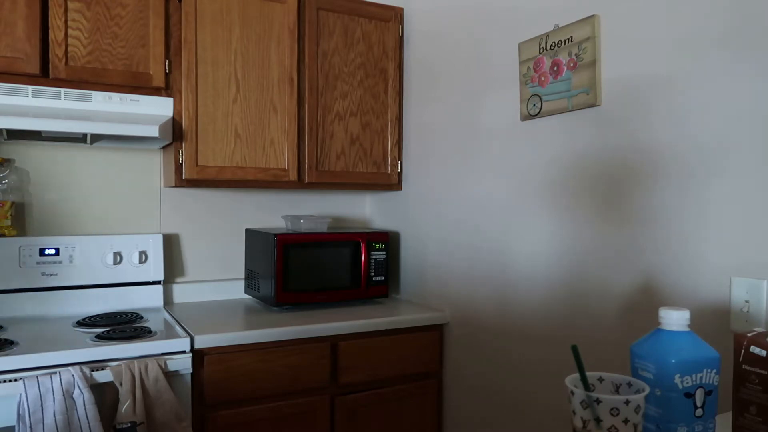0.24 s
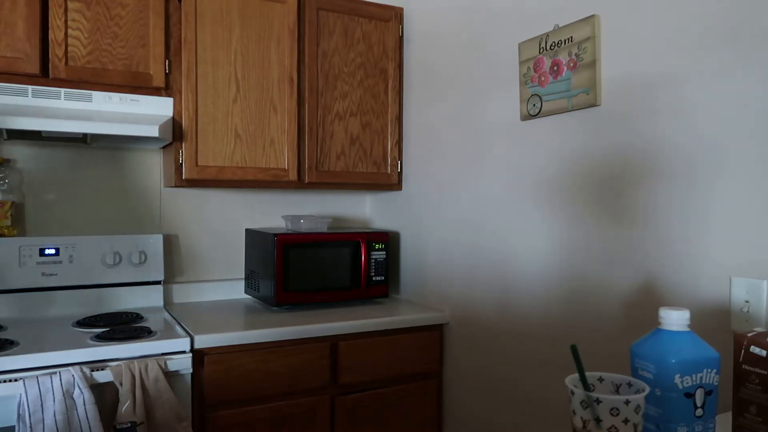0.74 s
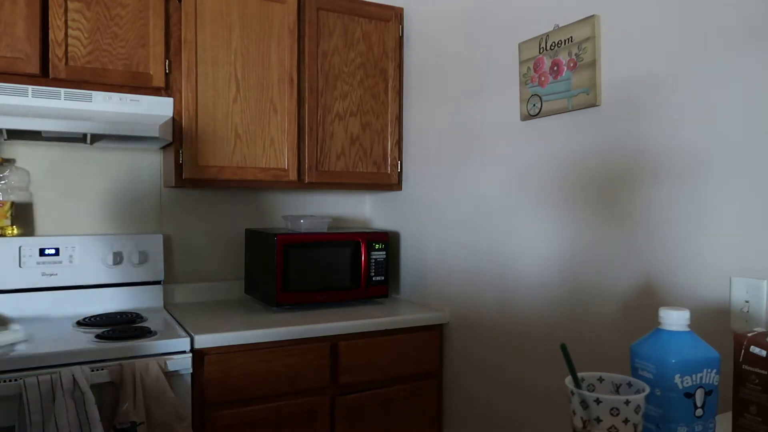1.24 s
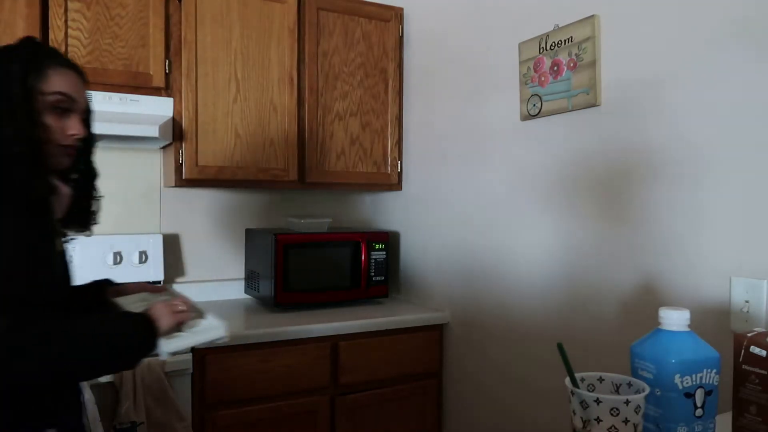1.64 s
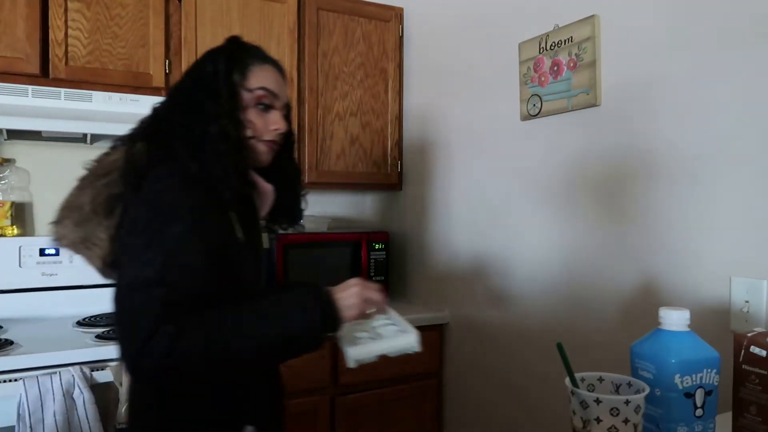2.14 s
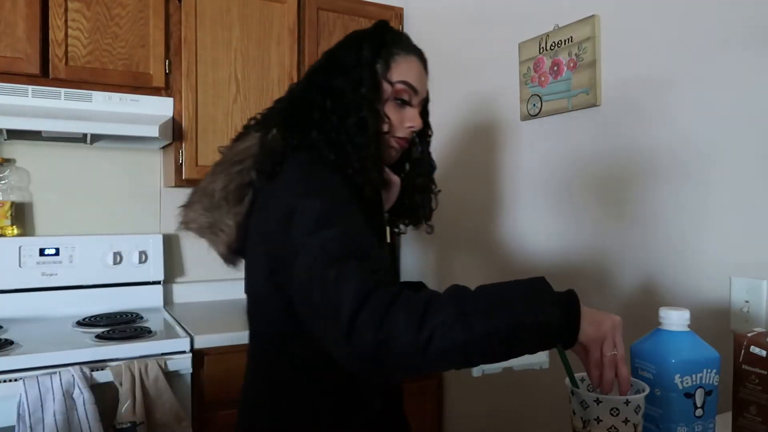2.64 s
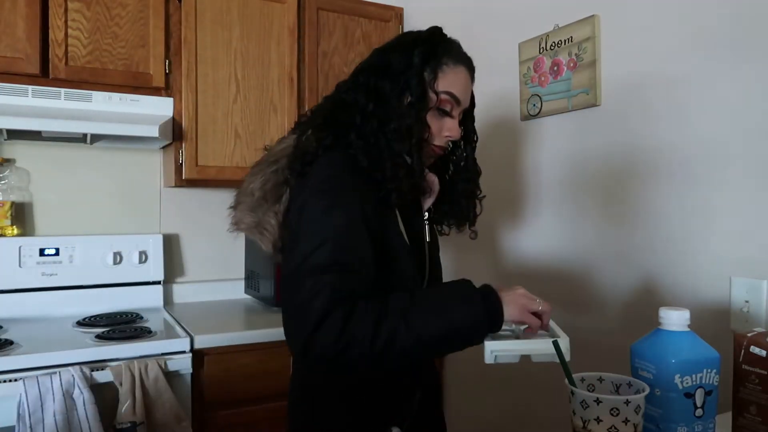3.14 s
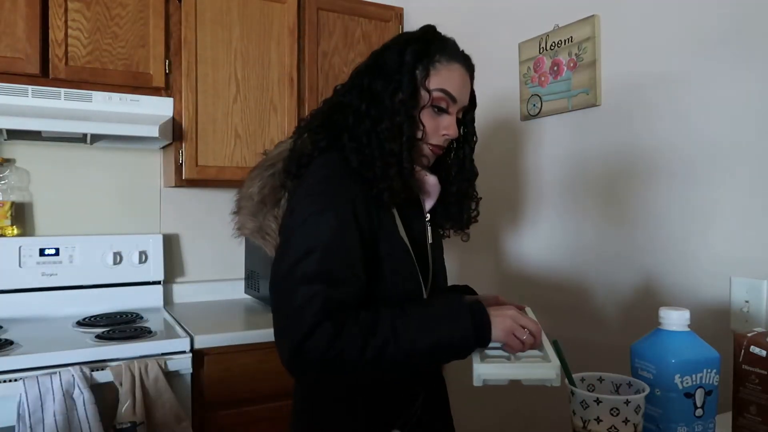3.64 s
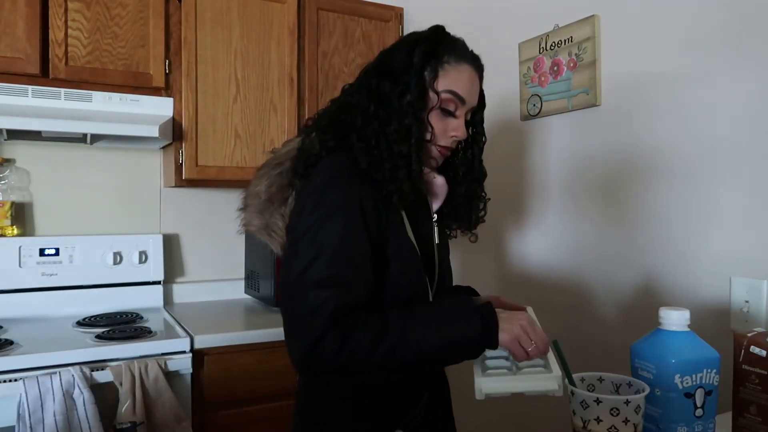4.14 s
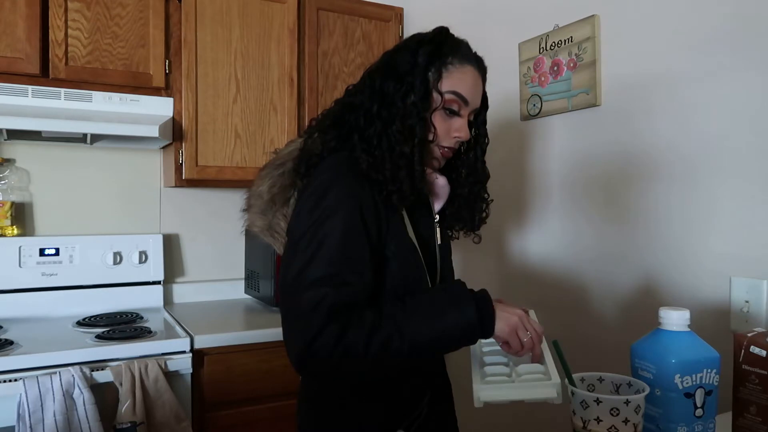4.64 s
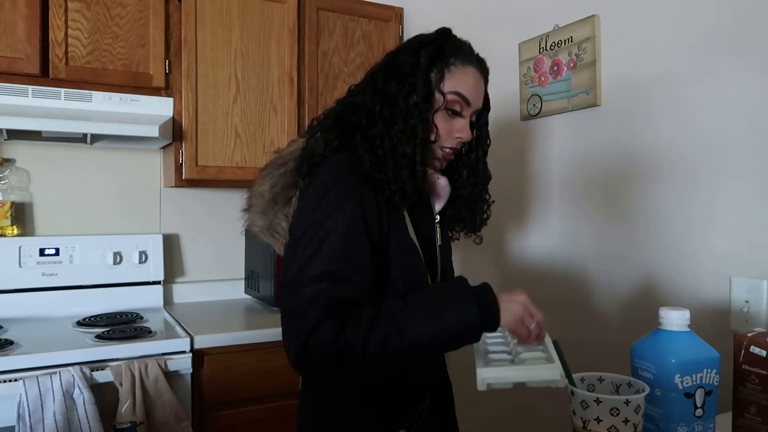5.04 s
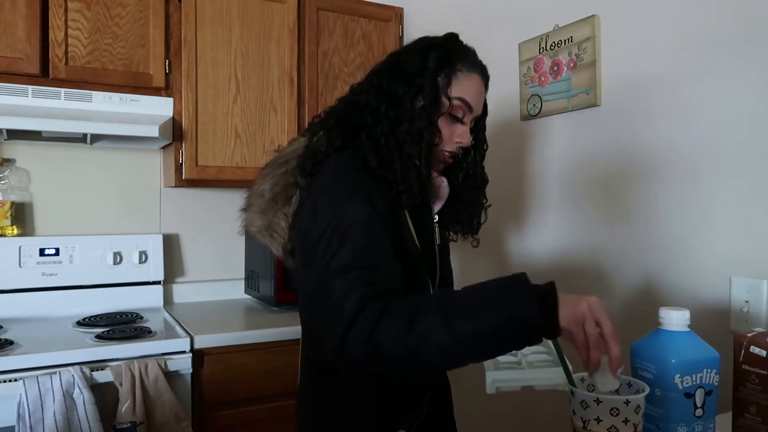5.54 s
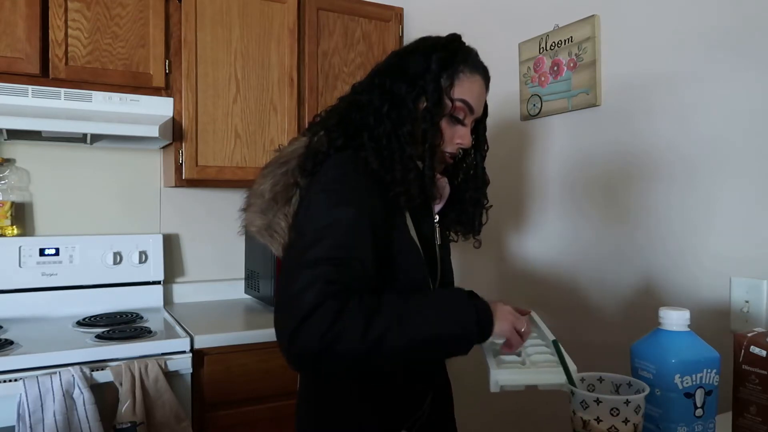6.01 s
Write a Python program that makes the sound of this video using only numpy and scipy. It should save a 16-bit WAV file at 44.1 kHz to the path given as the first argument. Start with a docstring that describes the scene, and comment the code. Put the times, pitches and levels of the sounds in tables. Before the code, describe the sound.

Ice crackles and snaps as a plastic tray is flexed, and two cubes clatter into a plastic cup in a quiet kitchen.

```python
"""Ice and plastic crackle and snap as someone flexes an ice tray and prises cubes loose, carrying it
from left to right across a quiet kitchen. Each slip or fracture is an impulse that excites the damped
modes of the tray and of ice splinters. Two cubes drop into a plastic cup, ringing its wall and thudding
on the counter. Behind it a fridge hums, steps thud and two close microphone ports hiss."""
import sys
import numpy as np
from scipy import signal
from scipy.io import wavfile
from scipy.ndimage import uniform_filter1d

SR = 44100
rng = np.random.default_rng(int(sys.argv[2]) if len(sys.argv) > 2 else 0)


def store_wav(level_fs):
    """Save 16-bit WAV to argv[1]."""
    pcm = np.round(np.clip(np.atleast_2d(level_fs), -1, 1) * 32767)
    wavfile.write(sys.argv[1], SR, pcm.T.astype(np.int16))


N = 276674

# modes of the plastic tray: (frequency [Hz], level [dB], t60 [s])
TRAY_MODES = [(736, -6.5, 0.013), (850, -8.5, 0.011), (1152, -0.5, 0.0075), (1348, -5.5, 0.015),
              (1607, -0.5, 0.012), (1807, -3, 0.013), (1967, -5, 0.017), (2144, -5.5, 0.017),
              (2323, -7, 0.019), (2535, -2.5, 0.015), (2796, 0, 0.01), (3166, -4.5, 0.014),
              (3540, 0.5, 0.01), (4007, 2, 0.0088), (5114, -2.5, 0.025), (5690, -6.5, 0.039),
              (6850, -12.5, 0.0071), (8000, -23, 0.011)]
SPLINTER_HZ = np.geomspace(3300, 14500, 26)


def amp(db):
    return 10 ** (np.asarray(db) / 20)


def power(db):
    return amp(2 * db)


def unit_rms(x):
    return x / np.sqrt(np.mean(x ** 2) + 1e-20)


def unit_peak(x):
    return x / abs(x).max()


def curve_at(points, hz):
    """Interpolation on a logarithmic frequency axis."""
    knots_hz, values = np.transpose(points)
    return np.interp(np.log(hz + 1), np.log(knots_hz + 1), values)


def add(mix, start_s, sound):
    part = mix[round(start_s * SR):][:len(sound)]
    part += sound[:len(part)]


def damped_mode(hz, db, t60, rise_s=0.00042):
    """Free vibration: a sinusoid with a soft onset and exponential decay."""
    t = np.arange(8192) / SR
    return amp(db - 60 * t / t60) * np.sin(2 * np.pi * hz * t) * (1 - np.exp(-t / rise_s))


def coupling(hz, centre_hz, octaves):
    """Selective excitation: modes far from the centre frequency of a blow respond less."""
    return 1 / (1 + (np.log2(hz / centre_hz) / octaves) ** 2)


def rattle(noise, db, t60):
    """Impulsive excitation: one blow, then sparse dying after-slips; db is their energy re the blow."""
    slips = noise ** 3 * amp(-60 * np.arange(len(noise)) / SR / max(t60, 0.004))
    return np.r_[1, np.zeros(40), amp(db) * slips / np.linalg.norm(slips)]


def room_tone():
    """Partial coherence: room noise and port hiss are alike at the two ports only in the bass."""
    # noise spectrum: (frequency [Hz], relative density [dB])
    spectrum = [(15, -17.5), (30, -45), (70, -2.5), (125, -9.5), (220, -9.5), (420, -8.5), (520, -15),
                (800, -17), (2500, -23), (5000, -27.5), (10000, -39.5), (14000, -45.5), (16000, -58)]
    # likeness of the two ports: (frequency [Hz], correlation [-1 to 1])
    correlation = [(60, 1), (180, 0.7), (550, 0.19), (1650, -0.44), (4970, -0.19), (15000, -0.08)]
    hz = np.fft.rfftfreq(2048, 1 / SR)[:, None]
    shape = (2, len(hz), N // 512 + 5)
    left, independent = rng.standard_normal(shape) + 1j * rng.standard_normal(shape)
    alike = curve_at(correlation, hz)
    right = alike * left + np.sqrt(1 - alike ** 2) * independent
    spectra = np.array([left, right]) * amp(curve_at(spectrum, hz))
    return amp(-51.5) * unit_rms(signal.istft(spectra, nperseg=2048, noverlap=1536)[1][:, :N])


def fridge():
    """Amplitude modulation: steady hum tones waver a little in strength."""
    # hum tones: (frequency [Hz], rms level [dB])
    tones = [(62, -64.5), (120, -55.5), (400.5, -58)]
    t = np.arange(N) / SR
    wavers = uniform_filter1d(uniform_filter1d(rng.standard_normal((len(tones), N)), 5000), 5000)
    return sum(np.sqrt(2) * amp(db + 0.58 * unit_rms(waver)) * np.sin(2 * np.pi * hz * t)
               for (hz, db), waver in zip(tones, wavers))


def steps():
    """Forced vibration: floor boards give under each footfall, settle, and murmur in between."""
    # footfalls: (time [s], level [dB])
    footfalls = [(.14, -50), (.4, -68), (.68, -46.5), (.95, -57), (1.2, -50), (1.55, -52), (1.81, -61),
                 (2.2, -54.5), (3.04, -63), (4.0, -59), (5.47, -68)]
    rise_s, fall_s, murmur_db = 0.043, 0.14, -68
    t = np.arange(N) / SR
    boards = signal.sosfilt(signal.butter(3, [22, 55], "band", fs=SR, output="sos"), rng.standard_normal(N))
    swells = sum(power(db) * np.exp(-((t - s) / np.where(t < s, rise_s, fall_s)) ** 2)
                 for s, db in footfalls)
    return unit_rms(boards) * np.sqrt(power(murmur_db) + swells)


def kitchen(source):
    """Reverberation: sparse echoes die away by band; the close ports differ mainly in the treble."""
    # reverberation time: (frequency [Hz], t60 [s])
    decay = [(300, 0.17), (800, 0.14), (2100, 0.14), (5500, 0.14), (12000, 0.085)]
    echoes = np.zeros((2, SR // 2))
    slots = np.arange(160, SR // 2 - 20, 20)
    arrivals = slots + rng.integers(0, 20, (2, len(slots)))
    np.put_along_axis(echoes, arrivals, rng.choice([-1., 1.], arrivals.shape), 1)
    hz, t, spectra = signal.stft(echoes, SR, nperseg=256)
    spectra = spectra * amp(-60 * t / curve_at(decay, hz)[:, None])
    width = np.clip(hz / 9000, 0, np.pi / 4)[:, None]
    mid, side = np.cos(width) * spectra[0], np.sin(width) * spectra[1]
    tail = signal.istft(np.array([mid + side, mid - side]), SR, nperseg=256)[1]
    return signal.fftconvolve(source[None], tail / np.linalg.norm(tail[0]), axes=1)[:, :N]


def ports(source):
    """Path difference: direction delays one port against the other; near surfaces scatter it."""
    # path of the source: (time [s], direction [-1 left, 1 right])
    path = [(0, -1.1), (.9, -0.97), (1.3, -1.1), (1.8, 0.84), (2.4, 0.92), (3.2, 0.79), (6.27, 0.98)]
    # lag between the ports for a source at one side: (frequency [Hz], phase [rad])
    lag = [(100, 0), (2000, .15), (3700, .35), (6800, 1.6), (11000, 2.8), (16000, 3.3)]
    hz, t, spectra = signal.stft(source, SR, nperseg=128)
    direction = np.interp(t, *np.transpose(path))
    scattered = direction + 0.5 * rng.standard_normal(spectra.shape)
    steer = amp(0.4 * direction) * np.exp(0.5j * curve_at(lag, hz)[:, None] * scattered)
    return signal.istft(np.array([spectra / steer, spectra * steer]), SR, nperseg=128)[1][:, :N]


def ice_splinters():
    """Damped resonators: each splinter of ice rings briefly at its own pitch."""
    # strength of the ringing: (frequency [Hz], relative level [dB])
    strength = [(3300, -9), (4200, -8.5), (5300, -7.5), (6700, -4), (7600, -8.5), (10000, -6),
                (12000, -8.5), (14500, -20)]
    cycles = rng.uniform(10, 34, len(SPLINTER_HZ))  # to fall by 30 dB
    return np.array([damped_mode(hz, curve_at(strength, hz), 2 * n / hz, 0.0001)[:1024] * np.sqrt(hz / n)
                     for hz, n in zip(SPLINTER_HZ, cycles)])


def cup(splinters):
    """Impact excitation: each touch of a tumbling cube rings the cup, the ice and the counter."""
    # touches: (time [s], relative level [dB], ring centre [Hz], thud offset [dB], rattle re blow [dB])
    touches = [(2.897, -30, 1340, -30, -6), (2.9088, -18, 1450, -29, -10), (2.913, -21, 1450, -25, 2.5),
               (2.923, -29, 1500, -15, 5), (2.944, -30, 1510, -34, 3), (2.999, -35, 1320, -15, -5),
               (5.801, -2, 1570, -26, -3), (5.807, -9, 940, -19, -7), (5.8117, -24, 673, -8.5, -29),
               (5.835, -21, 1500, -30, 2), (5.847, -25, 1380, -28, 9.5), (5.886, -24.5, 1330, -14, 7),
               (5.918, -32.5, 1390, -7, 1)]
    # modes of the cup wall: (frequency [Hz], level [dB], t60 [s])
    cup_modes = [(708, 5, 0.061), (754, -10, 0.039), (815, 6, 0.051), (930, -4.5, 0.032), (960, 0, 0.023),
                 (1186, -4.5, 0.018), (1400, 6, 0.014), (1497, 6.5, 0.0087), (1696, 12, 0.0048),
                 (2280, 0, 0.022), (2295, -2, 0.026), (2960, 1.5, 0.044), (3260, -6, 0.035)]
    # modes of the counter beneath: (frequency [Hz], level [dB], t60 [s])
    counter_modes = [(144, 0, 0.092), (177, 0, 0.064), (260, -5, 0.07)]
    rings = np.array([damped_mode(*mode, rise_s=0.0013) for mode in cup_modes])
    thud = unit_peak(sum(damped_mode(*mode, rise_s=0.0059) for mode in counter_modes))
    ice = unit_peak(coupling(SPLINTER_HZ, 3570, 0.14) @ splinters)
    out = np.zeros(N)
    for s, db, centre_hz, thud_db, rattle_db in touches:
        weights = coupling(np.array(cup_modes)[:, 0], centre_hz, 0.4) * rng.normal(1, 0.25, len(rings))
        blows = rattle(rng.standard_normal(6000), rattle_db, t60=0.07)
        add(out, s, amp(db - 5.5) * signal.oaconvolve(blows, unit_peak(weights @ rings)))
        add(out, s, amp(db - 16) * signal.oaconvolve(blows, ice))
        add(out, s, amp(db + thud_db + 3) * thud)
    return out


def flexing():
    """Power summation: twists add to three levels (tray, chips, dull); the strongest leads the pitch."""
    # efforts of the hands: (peak time [s], build-up [s], strain level [dB], chips re strain [dB],
    # dull low modes re strain [dB], ring centre [Hz])
    twists = [(.056, 0.052, -40.5, -9.5, -14, 2530), (.202, 0.1, -47.5, -0.5, -7, 2450),
              (0.287, 0.043, -40.5, -4.5, -16, 2170), (0.421, 0.0087, -40.5, 9, -21, 2600),
              (.47, 0.049, -24.5, -1, -8, 2760), (.543, 0.095, -25.5, 2.5, -11.5, 2930),
              (.63, 0.14, -36, 7.5, -23, 2870), (0.704, 0.14, -28, 1, -10, 2920),
              (0.915, 0.049, -31, 3.5, -19, 3120), (0.999, 0.14, -26, -8, -17, 2420),
              (1.23, 0.091, -43, -7.5, -4, 2830), (1.312, 0.019, -33, -3.5, -7.5, 2360),
              (1.46, 0.31, -39.5, -24, -4.5, 2290), (1.565, 0.033, -33.5, -5.5, -13, 2370),
              (1.62, 0.12, -36.5, -17, -10.5, 2240), (1.68, 0.11, -35.5, -3.5, -7, 2260),
              (1.744, 0.018, -28, -3, -8, 2130), (1.82, 0.068, -36, -7.5, -3.5, 1980),
              (1.92, 0.064, -38, -13.5, -6.5, 2180), (2.024, 0.075, -21, -13.5, -8.5, 2070),
              (2.3, 0.13, -49.5, -3.5, -1, 2470), (3.046, 0.075, -59, 4.5, 3, 2670),
              (3.268, 0.027, -42.5, 2.5, -9.5, 2500), (3.364, 0.0057, -40.5, 6.5, -8, 2570),
              (3.42, 0.0088, -37.5, 6, -9.5, 2400), (3.441, 0.016, -32.5, 5.5, -8.5, 2470),
              (3.5, 0.077, -39, 3, -26, 2630), (3.561, 0.11, -23, -2, -14.5, 2570),
              (3.701, 0.036, -24, -5.5, -16, 2530), (3.729, 0.023, -22.5, -1.5, -6.5, 2290),
              (3.82, .1, -35.5, -14.5, -12, 2150), (3.877, 0.013, -34, -25, -6, 2460),
              (3.924, 0.036, -35.5, 2.5, -34, 2640), (4.079, 0.028, -30.5, 2.5, -12.5, 2870),
              (4.136, 0.059, -31.5, 3.5, -19, 2760), (4.2, 0.11, -35, 3.5, -13, 3000),
              (4.264, 0.02, -22.5, -4, -41, 2760), (4.349, 0.075, -24.5, -7.5, -8.5, 2660),
              (4.373, 0.012, -18.5, -5, -7.5, 2720), (4.455, 0.41, -29, -14, -27, 2900),
              (4.522, 0.017, -21, -11.5, -19.5, 3020), (4.657, 0.024, -31.5, -13, -7.5, 2520),
              (4.759, 0.0077, -30, -3, -22, 2560), (4.812, 0.011, -28.5, -16, -9, 2550),
              (4.906, 0.057, -25.5, -3, -15.5, 2470), (5.0, 0.05, -39, -13, 2.5, 2260),
              (5.08, 0.14, -27.5, -2, -24, 2320), (5.115, .01, -36.5, -18, -31, 2360),
              (5.943, 0.022, -55, 4.5, 9, 2130), (6.115, 0.0094, -35.5, 2, -4, 2590),
              (6.26, 0.053, -44, -3.5, -10, 2620)]
    # faint rustle of sleeves and handling between the twists: (time [s], level [dB])
    handling = [(0, -56), (.38, -46), (.83, -45), (1.15, -52), (1.5, -62), (2.2, -53), (2.85, -51.5),
                (3.14, -56.5), (3.3, -51.5), (4.03, -77), (4.6, -43.5), (4.72, -67), (5.2, -53.5),
                (5.35, -58.5), (5.5, -80.5), (5.8, -66.5), (6.0, -55.5), (6.27, -69)]
    climb_db, rustle_hz = 20, 2240
    t = np.arange(0, N / SR, 0.002)
    peak_s, build_s, db, chips_db, dull_db, centre_hz = np.array(twists).T[:, :, None]
    rustle = power(np.interp(t, *np.transpose(handling)))
    rising_db = db + climb_db * np.minimum(t - peak_s, 0) / build_s
    haste = 1 + 0.46 / (1 + (build_s / 0.017) ** 2)  # a sudden twist lets go sooner
    release = haste * np.maximum(t - peak_s, 0)
    tray, chips, dull = (power(rising_db - fall_rate * release) for fall_rate in (216, 236, 166))
    tray_power = tray.sum(0) + rustle
    chips_power = (chips * power(chips_db)).sum(0) + rustle * power(-7.5)
    dull_power = (dull * power(dull_db)).sum(0) + rustle * power(-4.5)
    ring_hz = ((tray * centre_hz).sum(0) + rustle * rustle_hz) / tray_power
    levels_db = 10 * np.log10([tray_power, chips_power, dull_power])
    return [np.interp(np.arange(N) / SR, t, track) for track in (*levels_db, ring_hz)]


def slip_trains(rows, per_s, spread_db):
    """Random point process: sparse impulses of either sign, a few of them large."""
    when, size, sign = rng.random((3, rows, int(per_s * N / SR)))
    impulses = amp(-spread_db * np.log(size + 0.18)) * np.sign(sign - 0.5)
    trains = np.zeros((rows, N))
    np.put_along_axis(trains, (when * N).astype(int), impulses, 1)
    return unit_rms(trains)


def crackle(splinters):
    """Acoustic emission: dense micro-cracks ring each tray mode and each splinter independently."""
    tray_db, chips_db, dull_db, ring_hz = flexing()
    tray = np.array([damped_mode(*mode)[:4096] for mode in TRAY_MODES])
    groups = [(tray[:4], np.ones((4, 1)), dull_db - 4, 200, 3.5),
              (tray[4:], coupling(np.array(TRAY_MODES)[4:, :1], ring_hz, 0.56), tray_db - 3, 180, 4),
              (splinters, 1.43 + coupling(SPLINTER_HZ[:, None], 4910, 0.22), chips_db - 2.5, 400, 3)]
    out = np.zeros(N)
    for rings, share, db, per_s, spread_db in groups:
        share = share / np.sqrt(np.sum(rings ** 2, 1) @ share ** 2)  # same power at any ring centre
        slips = slip_trains(len(rings), per_s, spread_db) * share * amp(db)
        out += signal.oaconvolve(slips, rings, axes=1).sum(0)[:N]
    return out


def fractures():
    """Brittle fracture: a clean break radiates one bright minimum-phase pulse."""
    # clean breaks: (time [s], relative level [dB])
    breaks = [(.4813, -25), (1.307, -35), (2.915, -35), (4.514, -41), (4.807, 1.5), (5.805, -30),
              (5.8857, -45), (6.1114, -22)]
    # spectrum of the pulse: (frequency [Hz], relative density [dB])
    spectrum = [(600, -41), (2500, -5), (5000, -0.5), (9000, -1), (14000, -8), (17000, -10)]
    log_gain = np.log(amp(curve_at(spectrum, abs(np.fft.fftfreq(2048, 1 / SR)))))
    pulse = np.fft.ifft(np.exp(np.conj(signal.hilbert(log_gain)))).real[:1024]
    out = np.zeros(N)
    for s, db in breaks:
        add(out, s, amp(db + 5) * unit_peak(pulse))
    return out


def snaps(splinters):
    """Sudden strain release: ice lets go, striking tray modes and chance splinters, then rattling."""
    # releases: (time [s], relative level [dB], ring centre [Hz], chips offset [dB], breadth [octaves])
    releases = [(.4149, -34, 4900, -19, .14), (0.4645, -34, 2800, -6, 0.21),
                (0.4736, -25.5, 3080, 4.5, 0.15), (.5237, -32, 4310, -14, .25),
                (0.533, -20, 3700, -13, 0.35), (.632, -18, 2360, -6, 0.33),
                (0.6955, -21.5, 3070, -23, 0.21), (0.984, -13, 2240, -17, 0.13),
                (1.2311, -33, 3300, -29, 0.15), (1.3088, -24.5, 2280, -6, .25),
                (1.5593, -29, 2480, -25, 0.16), (1.7383, -36, 1530, -18, .21),
                (1.9999, -21, 2120, -37, 0.18), (2.0117, -8.5, 2190, -40, 0.087),
                (2.0263, -10.5, 2380, -22, 0.45), (2.9816, -37, 2300, -27, 0.36),
                (3.0223, -41.5, 2820, -6.5, 0.37), (3.242, -30, 2250, -34, 0.27),
                (3.263, -28, 2450, -7, 0.36), (3.3598, -23.5, 2340, -7.5, 0.14),
                (3.4178, -27, 2410, -10, 0.18), (3.4397, -18, 2820, -24, 0.17),
                (3.4619, -15, 2450, -8.5, 0.38), (3.5034, -25, 3300, -10, 0.22),
                (3.6952, -11.5, 2760, -16, 0.11), (3.704, -19, 2500, -15, 0.2),
                (3.713, 4.5, 2033, -42, 0.23), (3.7166, -6.5, 1840, -21, .14), (3.7531, -9, 2480, -7, 0.3),
                (3.8737, -18.5, 2470, -20, 0.11), (3.917, -36, 5190, 1.5, 0.24),
                (4.0537, -33, 3620, -16, .22), (4.2587, -31, 2360, -27, 0.26),
                (4.2926, -13.5, 2870, -11, 0.23), (4.366, -5, 2230, -35, 0.042),
                (4.3803, -12, 2600, -25, 0.72), (4.4458, -19.5, 2320, -29.5, 0.065),
                (4.5128, -5, 2270, -17.5, 0.15), (4.5161, -6.5, 3520, -27, 0.074),
                (4.6545, -21, 2290, -39, 0.44), (4.672, -26.5, 2480, -13, 0.45),
                (4.7566, -22.5, 2220, -4, .22), (4.802, -13.5, 1360, -12, 0.1),
                (4.8933, -20, 2460, -27, .2), (5.002, -19, 2270, -31.5, .15),
                (5.029, -23.5, 2020, -9, 0.22), (5.0603, -22, 2420, -7, .15),
                (5.1107, -12, 2390, -36.5, 0.095), (5.7314, -52, 4470, -11, 0.16),
                (5.9452, -42, 7350, -5, 0.086), (6.112, -18, 2500, -7, 0.16),
                (6.234, -36.5, 2360, -5.5, .25)]
    rings = np.array([damped_mode(*mode, rise_s=0.00089)[:4096] for mode in TRAY_MODES])
    out = np.zeros(N)
    for s, db, centre_hz, chips_db, octaves in releases:
        weights = coupling(np.array(TRAY_MODES)[:, 0], centre_hz, octaves) * rng.normal(1, 0.3, len(rings))
        shards = unit_peak(rng.standard_normal(len(splinters)) @ splinters)
        # the harder the snap, the longer its after-slips last and the weaker they are beside the blow
        t60 = 0.036 * amp(0.37 * (db + 18.5))
        rattle_db = -0.5 - 0.1749 * (db + 22)
        noise = rng.standard_normal(5000)
        blows = rattle(noise, rattle_db, t60)
        crumbs = rattle(noise, rattle_db + 7, t60)  # chips break mostly after the blow
        add(out, s, amp(db - 2.5) * signal.oaconvolve(blows, unit_peak(weights @ rings)))
        add(out, s, amp(db + chips_db + 5) * signal.oaconvolve(crumbs, shards))
    return out


def scene():
    """Superposition: the direct sound of the ice, its reverberation and the background."""
    splinters = ice_splinters()
    ice = cup(splinters) + crackle(splinters) + fractures() + snaps(splinters)
    return room_tone() + fridge() + steps() + amp(-10) * kitchen(ice) + ports(ice)


def record(dry):
    """Soft saturation of the input stage near full scale, then a low-pass band limit."""
    ceiling, edge_hz = 0.96, 15900
    saturated = dry / (1 + (dry / ceiling) ** 6) ** (1 / 6)
    lowpass = signal.firwin(511, edge_hz, window=("kaiser", 9), fs=SR)
    return signal.oaconvolve(saturated, lowpass[None], "same")


dry = scene()
out = record(dry)
store_wav(out)
```